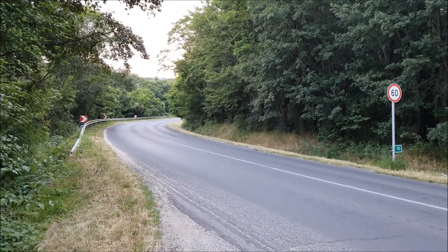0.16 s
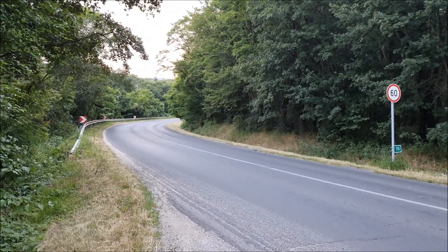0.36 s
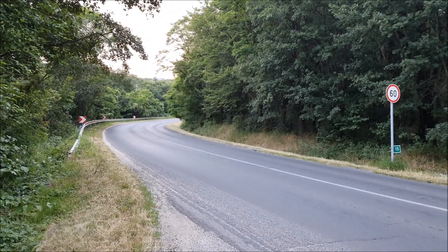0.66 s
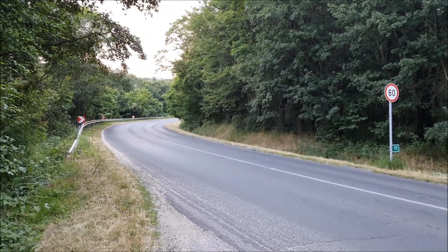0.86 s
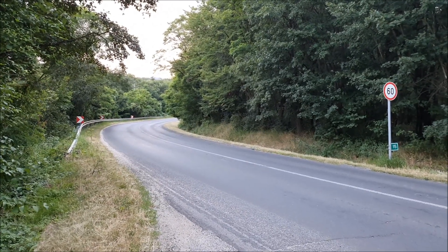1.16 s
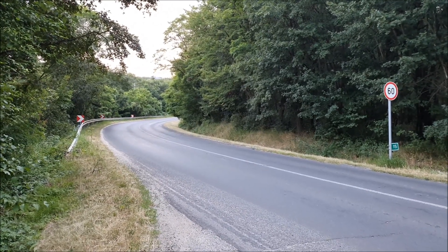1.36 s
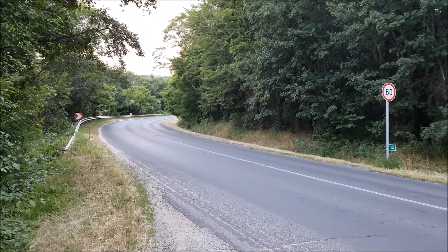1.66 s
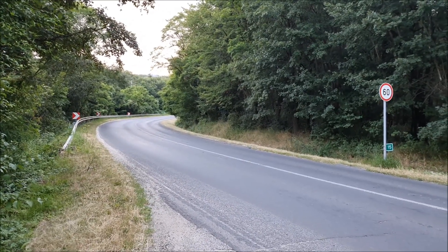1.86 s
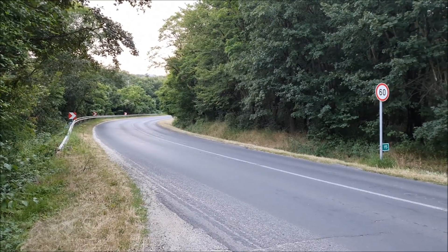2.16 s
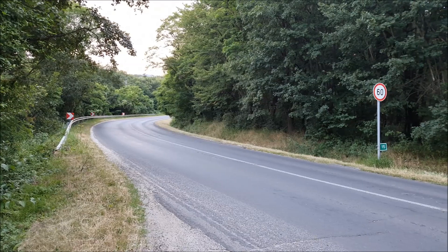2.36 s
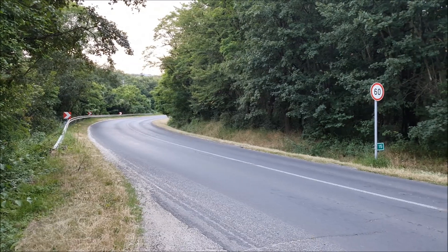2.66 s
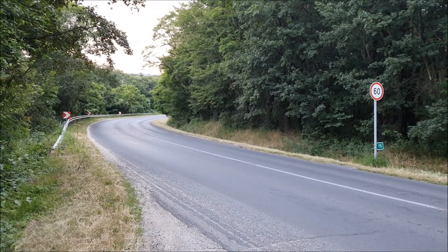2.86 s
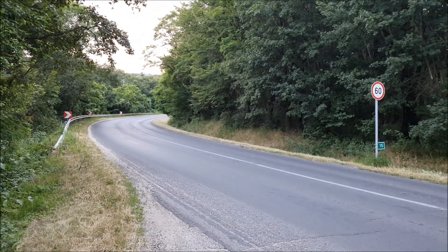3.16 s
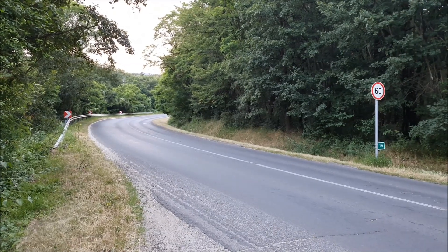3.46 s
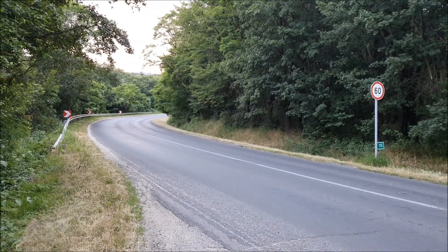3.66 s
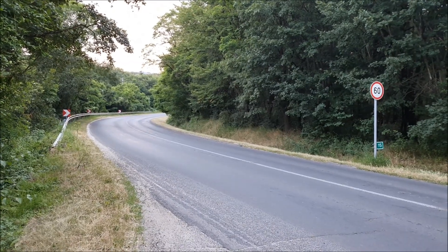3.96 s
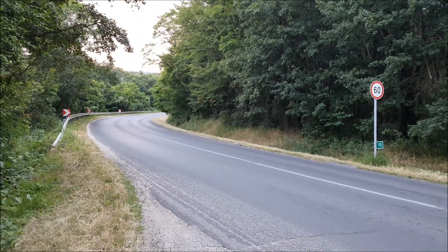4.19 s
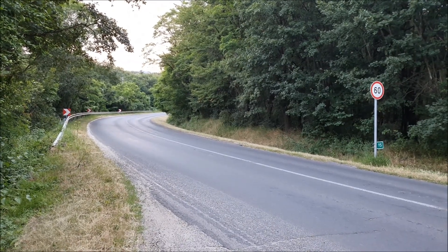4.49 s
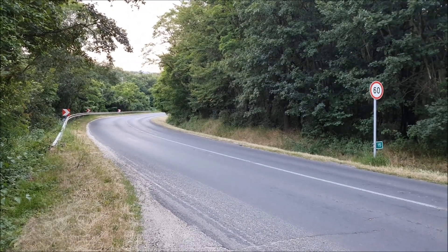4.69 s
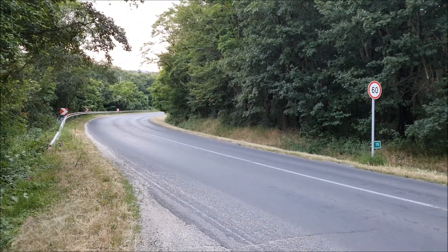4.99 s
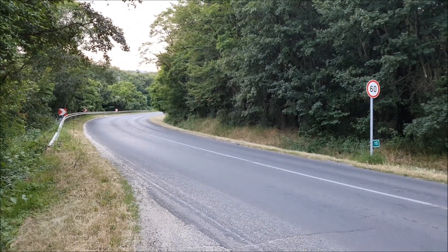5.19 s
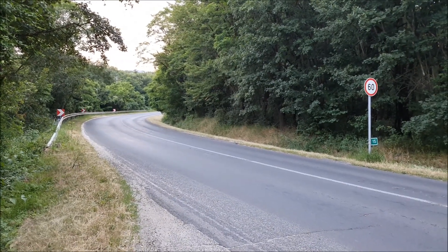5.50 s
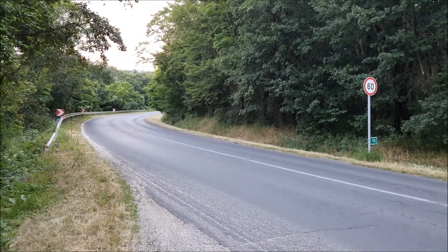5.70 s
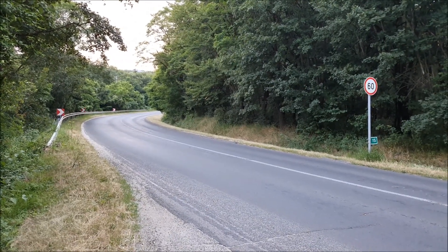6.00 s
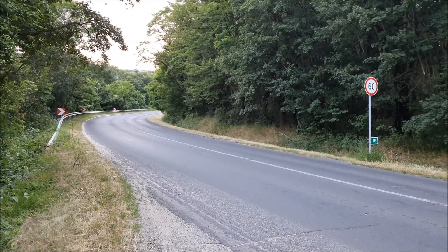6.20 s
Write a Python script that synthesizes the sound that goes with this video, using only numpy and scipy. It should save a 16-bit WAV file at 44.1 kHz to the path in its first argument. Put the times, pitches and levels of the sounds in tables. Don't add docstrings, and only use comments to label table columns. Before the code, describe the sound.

Forest road, distant stereo microphones, car never near. At 0 s a six-cylinder exhaust drones under load around 120 Hz, raspy with hollow singing in the pipe. At about 0.2 s the throttle lifts: the note stumbles with a soft thump and small woody knock, stumbling again near 0.4 s. High chirps sound on the left at 0.3-0.6 s. The roar thins and the hum slides gradually lower; a faint pop comes at 1.5 s. Small birds peep, with clearer falling whistles at 2.5 and 2.75 s. At 3.64 s the loudest bang hits, a deep thump with a hard, ringing double crack scattering among trees; the level ducks, then recovers. A tight double pop follows at 4.6 s, another at 4.95 s, then lighter crackles roughly every 0.2 s until 6.2 s, one sharply ticking at 5.4 s. The wavering drone sinks to about 95 Hz over soft tyre roar and very faint leaf hiss, ending around 6.3 s.

```python
import sys
import numpy as np
from scipy import signal
from scipy.fft import rfft, irfft, next_fast_len
from scipy.io import wavfile
from scipy.ndimage import uniform_filter1d

SR = 44100
rng = np.random.default_rng(int(sys.argv[2]) if len(sys.argv) > 2 else 0)


def transcribe(u):
    v = np.clip(np.atleast_2d(u).T, -1, 1)
    q = np.round(v * 32767).astype(np.int16)
    wavfile.write(sys.argv[1], SR, q)


def magnitude_from_level(level_db):
    exponent = np.asarray(level_db, float) / 20
    return 10 ** exponent


N = 279679

# (time [s], firing rate [Hz], firing note [dB], exhaust flow, from 3.6 s with the bangs'
# # rolling echo [dB])
COAST = [(0, 121.3, -32, -0.5), (.4, 120.8, -27, -4.5), (.55, 117.2, -29.5, -7.5),
         (1.1, 115.8, -29.5, -12.5), (2.0, 111.6, -28.5, -18.5), (2.5, 109.2, -30, -18.5),
         (3.3, 106, -30.5, -21), (3.6, 105, -34, -20), (3.72, 101.2, -29, 0.5), (3.95, 101.2, -35.5, -4),
         (4.3, 100.6, -32.5, -16), (4.75, 100, -38.5, -8), (5.1, 99, -36, -12), (5.4, 97, -39, -17.5),
         (5.9, 95.8, -38.5, -17.5), (6.34, 95.4, -39, -16)]
# (time [s], dip [dB], half length [s], pitch sag [Hz])
STUMBLES = [
    (0.231, -17, .014, 10.06),
    (0.438, -14.5, 0.0178, 5.99),
    (1.543, -6, 0.015, 0.3),
]
REBOUND = 0.11
LIFT_S = 0.225
# (turns of the crankshaft [ratio], level [dB])
COASTING_ORDERS = [(0.5, -56), (1.3, -29.5), (1.4, -31.5), (2, -16.5), (2.5, -23), (3, 0), (3.5, -22),
                   (4, -25), (4.5, -31), (5, -23.5), (5.5, -27.5), (6, -26.5), (7.3, -41), (7, -30),
                   (7.5, -32.5), (8, -25.5), (7.7, -32), (9, -32), (9.5, -29), (10, -35.5), (9.6, -41),
                   (9.8, -36), (13, -32), (12, -38.5), (13, -38.5), (13, -32), (13.5, -47), (14, -26),
                   (17, -42.5), (15, -41)]
# (nominal turns, not read [ratio], level
# [dB])
PULLING_ORDERS = [(0.5, -34), (1, -22), (1.5, -25.5), (2, -11.5), (2.5, -19.5), (3, 0), (3.5, -5), (4, -6),
                  (4.5, -7.5), (5, -4), (5.5, -9), (6, -23.5), (6.5, -33), (7, -10.5), (7.5, -18), (8, -23),
                  (8.5, -16.5), (9, -11.5), (9.5, -30), (10, -25), (10.5, -21.5), (11, -25), (11.5, -43),
                  (12, -31), (12.5, -19), (13, -13), (13.5, -23.5), (14, -15), (18, -13), (15, -16)]
UNEVEN_DB, UNEVEN_SHARE = -36, 0.8
FOURTH_DB, FOURTH_DB_PER_HZ = -34, -0.3445
WAVER_DB, CUT_S, CUT_WAVER_DB = 0.9, 3.66, 2.6

# (resonance [Hz], width [Hz], level at full flow [dB])
PIPE_TONES = [
    (361.5, 24, -44),
    (531.3, 19, -45.5),
    (750, 30, -52),
]
PIPE_SHARE = 0.78

# (time of the trough [s], level [dB], pitch [Hz], ring [s])
THUMPS = [(0.227, -32, 69.6, 0.0089), (0.419, -32, 90, .008), (1.522, -27, 106, 0.0061),
          (3.6289, -20.5, 125, 0.027), (3.6383, -4, 97, 0.014), (4.5931, -18.5, 185, 0.0023),
          (4.5989, -11.5, 147, 0.0026), (4.609, -13, 59.5, 0.0084), (4.9506, -13, 115, 0.0044),
          (5.1845, -15.5, 108, 0.011), (5.3966, -16, 109, 0.0083), (5.598, -16, 109.3, 0.0058),
          (5.839, -15, 112, 0.0073), (6.0178, -17.5, 105.7, 0.007), (6.2062, -14, 110, 0.0046)]
# (time [s], level [dB], length [s], tail pipe ring [Hz], second ring [Hz])
CRACKS = [(1.539, -36.5, 0.0028, 794, 2600), (3.645, -23, 0.0027, 687, 1740),
          (3.6535, -18.5, 0.0038, 710, 1710), (4.596, -28.5, 0.014, 464, 900),
          (4.6118, -18, 0.003, 775, 2240), (4.6172, -18, 0.0027, 760, 1160),
          (4.9662, -20, 0.004, 750, 1257), (5.2035, -31.5, 0.0067, 1200, 2250),
          (5.411, -28.5, 0.0013, 836, 2620), (5.414, -36.5, 0.0018, 1270, 1320),
          (5.6128, -36, 0.0055, 760, 1300), (5.856, -30.5, 0.0043, 857, 2220),
          (6.031, -37, 0.0033, 740, 1700), (6.2225, -29, 0.0037, 800, 1710),
          (3.697, -37.5, 0.0065, 1880, 1510)]
# (frequency [Hz], density [dB per Hz])
CRACK_COLOUR = [(150, -34), (300, -4.5), (620, -1.5), (770, 1), (1100, -2), (1640, -7), (2250, -10),
                (3050, -15), (4800, -45.5), (5600, -59), (6500, -66), (8200, -84), (12000, -88.5)]
TIP_HZ = [2760, 3900, 4800]
RING, TIP_RING = 5.5, 2.5
TREBLE_LAG_S, FULL_RING_S = 0.0015, 0.0045
BRIGHT_DB, BRIGHT_DB_PER_MS, BRIGHT_PER_DB = 4, -0.63, 0.07
# (time [s], level [dB])
TICK = (5.4115, -32)
# (frequency [Hz], level [dB])
TICK_COLOUR = [(3000, -20.5), (5500, 0.5), (7200, -26.5), (9000, 4.5), (14000, -6.5)]

# (frequency [Hz], reverberation time T60 [s])
TREES_DECAY = [(300, 14), (790, 2.2), (2090, 1.3), (5510, 0.92)]
# (frequency [Hz], level [dB])
TREES_COLOUR = [(100, -14.5), (300, -3.5), (800, -9.5), (2000, -12.5), (3500, -14), (5000, 4), (7000, -13)]
SCATTER_DB, SCATTER_SHARE = -24.5, 0.56

# (start [s], length [s], resting pitch [Hz], starting pitch above it [Hz], level [dB])
HIGH_BIRD = [
    (.327, .07, 5770, 251, -67.5),
    (0.399, 0.12, 5890, 200, -69),
    (0.584, .065, 5800, 102, -73.5),
]
# (start [s], length [s], resting pitch [Hz], starting pitch above it [Hz], level [dB])
LOW_BIRD = [
    (1.279, 0.039, 3090, 101, -62),
    (1.78, 0.033, 3750, 9, -74.5),
    (2.025, 0.057, 3755, -9.5, -63.5),
    (2.503, 0.098, 3330, 190.5, -54),
    (2.744, 0.089, 3210, 418.5, -54.5),
]
# (start [s], length [s], resting pitch [Hz], starting pitch above it [Hz], level [dB])
FAINT_BIRDS = [
    (.984, .06, 3790, 60, -76),
    (1.6, .05, 4300, 300, -80),
    (1.635, .06, 4750, -200, -81),
    (1.81, .05, 5230, 10, -80),
    (1.86, .09, 2960, 100, -76),
    (2.08, .12, 3880, -60, -77),
    (2.3, .06, 3070, 10, -79),
]
# (start [s], length [s], resting pitch [Hz], starting pitch above it [Hz], level [dB])
KNOCK = [
    (0.257, 0.037, 1254, 39.9, -39.5),
]
SINGER_SIDES = [13.5, -4, -6, -11]
SINGER_FLUTTER = [.014, .008, .022, .008]
SINGER_ECHO = [-3, -9, -1, -9]
SETTLE_S = 0.014
CREST, ENDS_DB = 0.42, -17

# (frequency [Hz], density [dB per Hz])
ROAR_COLOUR = [(25, -21.5), (45, -5), (80, -2.5), (190, 0.5), (245, -19.5), (330, -9), (520, -13.5),
               (640, -19), (790, -10), (1750, -15.5), (1900, -22), (2380, -25.5), (2560, -33), (3300, -41),
               (6000, -56.5), (7400, -62)]
# (frequency [Hz], width [Hz], lift [dB])
ROAR_BODY = [(377, 40, 3.5), (560, 23, 1), (750, 28, 4), (1275, 89, 4), (1627, 69, 3.5), (2220, 150, 3.5),
             (2690, 80, 4.5)]
RUMBLE_DB, RUMBLE_SHARE, GUST_DB = -45.5, 0.16, 4.5
MIDDLE_DB, MIDDLE_SHARE = -30.5, 1.01
TYRES_DB, TYRES_SHARE, TYRES_DB_PER_S = -40.5, 0.22, -0.62

# (frequency [Hz], density [dB per Hz])
HISS_COLOUR = [(7500, -42), (7900, -7.5), (9000, -0.5), (10200, -5.5), (11000, -10), (13000, -13),
               (15700, -19.5)]
HISS_DB = -76

# (frequency [Hz], likeness [0 to 1])
PORT_LIKENESS = [(60, .995), (180, 1), (400, 0.76), (1000, 0.92), (2500, 0.7), (5000, 0.19), (9000, .3),
                 (11000, .5), (13000, 0.73)]
# (frequency [Hz], left minus right [dB])
CAR_TILT = [(60, -1.1), (400, -1.2), (750, -2), (1300, -5.5), (2600, -3.5), (5000, 0)]
LEAD_S = 0.00017


def evened(x):
    return x / np.sqrt(np.mean(x ** 2) + 1e-20)


def read(points, hz):
    f, value = np.transpose(points)
    return np.interp(np.log(hz + 1), np.log(f + 1), value)


def curves(rows, t):
    s, *columns = np.transpose(rows)
    return [np.interp(t, s, c) for c in columns]


def add(mix, s, sound):
    part = mix[..., round(s * SR):][..., :sound.shape[-1]]
    part += sound[..., :part.shape[-1]]


def drift(hz, size):
    return evened(signal.lfilter(*signal.butter(2, hz, fs=SR), rng.standard_normal(size)))


def colour(x, shape, tilt_db=0):
    hz = abs(np.fft.fftfreq(4096, 1 / SR))
    gain_db = read(shape, hz) + tilt_db * np.log2(hz / 1000 + 0.061)
    log_gain = gain_db * np.log(10) / 20
    taps = np.fft.ifft(np.exp(np.conj(signal.hilbert(log_gain)))).real[:2048]
    return signal.fftconvolve(x, taps[None] if x.ndim > 1 else taps, axes=-1)[..., :x.shape[-1]]


def port_half(hz, tilt, lead_s):
    return magnitude_from_level(read(tilt, hz) / 2) * np.exp(1j * np.pi * hz * lead_s)


def ports(x):
    size = next_fast_len(N + 4096)
    half = port_half(np.fft.rfftfreq(size, 1 / SR), CAR_TILT, LEAD_S)
    spectrum = rfft(np.pad(x, (0, 1024), "reflect"), size)
    return irfft(spectrum * np.array([half, 1 / half]), size)[:, :N]


def wash(level_db, patchy_db, tilt, lead_s):
    frames, hz = N // 256 + 5, np.fft.rfftfreq(1024, 1 / SR)[:, None]
    a, b, c, d, patches = rng.standard_normal((frames, 513, 5)).T
    patches = evened(uniform_filter1d(uniform_filter1d(patches, 8, 0), 12, 1))
    same = np.clip(read(PORT_LIKENESS, hz), -1, 1)
    left = a + 1j * b
    right = same * left + np.sqrt(1 - same ** 2) * (c + 1j * d)
    half = port_half(hz, tilt, lead_s)
    z = np.array([left * half, right / half])
    z *= magnitude_from_level(level_db(hz, np.arange(frames) * 256 / SR) + patchy_db * patches)
    return signal.istft(z, nperseg=1024, noverlap=768)[1][:, :N]


def engine():
    t = np.arange(N) / SR
    hz, note_db, flow_db = curves(COAST, t)
    uneven_db = UNEVEN_DB + UNEVEN_SHARE * flow_db
    fourth_db = np.maximum(FOURTH_DB + FOURTH_DB_PER_HZ * (hz - 95) - uneven_db, 0)
    for s, dip_db, half, sag_hz in STUMBLES:
        dip = np.exp(-((t - s) / half) ** 2)
        after = np.exp(-((t - s) / half - 2) ** 2)
        hz = hz - sag_hz * (dip + after)
        note_db = note_db + dip_db * (dip - REBOUND * after)
    unsteady_hz = uniform_filter1d(hz, 1200) * (1 + 0.004 * drift(12, N))
    crank = 2 * np.pi * np.cumsum(unsteady_hz) / SR / 3
    note_db = note_db + np.where(t < CUT_S, WAVER_DB, CUT_WAVER_DB) * drift(14, N)
    out = np.sqrt(2) * magnitude_from_level(note_db) * np.sin(3 * crank)
    waver = [drift(7, N) for k in range(6)]
    load = np.clip((LIFT_S - t) / 0.02, 0, 1)
    for k, ((order, db), (_, pulling_db)) in enumerate(zip(COASTING_ORDERS, PULLING_ORDERS)):
        if order == 3:
            continue
        level_db = db + load * (pulling_db - db - 11.5) + 18.5 + uneven_db
        level_db = level_db + fourth_db * {4: 1, 5: 0.4}.get(order, 0)
        level_db = level_db + 2 * (1 - load) * waver[k % 6]
        phase = order * crank + 6 * rng.random() + 0.3 * waver[(k + 2) % 6]
        out += magnitude_from_level(level_db) * np.sin(phase)
    return out


def pipe():
    flow_db = curves(COAST, np.arange(N) / SR)[-1]
    sung = np.zeros(N)
    for hz, width, db in PIPE_TONES:
        tone = signal.lfilter(*signal.iirpeak(hz, hz / width, SR), rng.standard_normal(N))
        sung += magnitude_from_level(db) * evened(tone)
    return magnitude_from_level(PIPE_SHARE * flow_db) * signal.lfilter(*signal.butter(2, [300, 850], "band", fs=SR), sung)


def thump(s, db, hz, ring):
    t = np.arange(-0.012, 0.06, 1 / SR)
    turns = hz * 0.022 * (1 - np.exp(-t / 0.023))
    body = np.where(t < 0, np.exp(-(t / 0.0035) ** 2), np.exp(-(t / (1.3 * ring)) ** 2))
    return s + t[0], -magnitude_from_level(db) * body * np.cos(2 * np.pi * turns)


def crack(db, length, bright_db, rings_hz):
    t = np.arange(0.06 * SR) / SR
    shocks = rng.standard_normal(len(t)) * magnitude_from_level(1.5 * rng.exponential(1, len(t)).clip(0, 4))
    z = rfft(shocks * (1 - np.exp(-t / (0.3 * length))) * np.exp(-t / length))
    shocks = irfft(z / uniform_filter1d(abs(z), size=5), len(t))
    shocks = shocks * np.clip(t / 0.001, 0, 1) * np.exp(-(t / (3 * length)) ** 2)
    ring_gain = min(length / FULL_RING_S, 1)
    first, second, *tips = [signal.lfilter(*signal.iirpeak(hz, 10, SR), shocks) * ring_gain
                            for hz in [*rings_hz, *TIP_HZ]]
    rest = shocks + RING * second + TIP_RING * sum(tips)
    rest = np.pad(rest, (round(TREBLE_LAG_S * SR), 0))[:len(t)]
    rung = colour(RING * first + rest, CRACK_COLOUR, bright_db)
    return magnitude_from_level(db) * rung / np.sqrt(np.mean(rung[:441] ** 2))


def trees(x, stretch):
    taps = np.zeros((2, SR))
    at = np.arange(200, SR - 20, 20) + rng.integers(0, 20, (2, (SR - 201) // 20))
    np.put_along_axis(taps, at, rng.choice([-1., 1.], at.shape), 1)
    taps[1] = 0.08 * taps[0] + 0.74 * taps[1]
    hz, t, z = signal.stft(taps, SR, nperseg=256)
    fade = magnitude_from_level(-60 * t / (stretch * read(TREES_DECAY, hz)[:, None]))
    swell = 1 + 0.78 * np.exp(-((t - 0.028) / 0.026) ** 2)
    tail = signal.istft(z * fade * swell, SR, nperseg=256)[1]
    return signal.fftconvolve(x[None], tail / np.linalg.norm(tail[0]), axes=1)[:, :N]


def birds():
    out, smear = np.zeros((2, N)), np.zeros(N)
    singers = [HIGH_BIRD, LOW_BIRD, FAINT_BIRDS, KNOCK]
    for notes, pan_db, flutter, echo_db in zip(singers, SINGER_SIDES, SINGER_FLUTTER, SINGER_ECHO):
        for s, length, rest_hz, above_hz, db in notes:
            t = np.arange(0, length, 1 / SR)
            hz = rest_hz + above_hz * np.exp(-t / SETTLE_S)
            away = np.interp(t / length, [0, CREST, 1], [1, 0, 1])
            level = magnitude_from_level(db + 3 + ENDS_DB * away ** 2) * signal.windows.tukey(len(t), 0.2)

            def whistle(wobble):
                wander = drift(250, 6000)[:len(t)]
                wobbly_hz = hz * (1 + wobble * (wander - wander.mean()))
                return level * np.sin(2 * np.pi * np.cumsum(wobbly_hz) / SR)
            note, blur = whistle(flutter), whistle(0.05)
            add(out, s, note * magnitude_from_level(np.array([[0.5], [-0.5]]) * pan_db))
            add(smear, s, magnitude_from_level(echo_db) * (0.8 * note + 0.8 * blur))
    return out + trees(smear, 0.6)


def roar():
    gusts = drift(2.3, N)[::256]

    def level_db(hz, t):
        flow_db = curves(COAST, t)[-1]
        rumble_db = RUMBLE_DB + RUMBLE_SHARE * flow_db + GUST_DB * np.resize(gusts, len(t))
        middle_db = MIDDLE_DB + MIDDLE_SHARE * flow_db
        high_db = TYRES_DB + TYRES_SHARE * flow_db + TYRES_DB_PER_S * t
        low = np.clip(np.log2(220 / (hz + 1)), 0, 1)
        high = np.clip(np.log2(hz / 450 + 0.01), 0, 1)
        parts_db = low * rumble_db + (1 - low - high) * middle_db + high * high_db
        body_db = sum(db * np.exp(-((hz - f) / width) ** 2) for f, width, db in ROAR_BODY)
        return read(ROAR_COLOUR, hz) + body_db + parts_db - 3.0
    return wash(level_db, 1.31, CAR_TILT, LEAD_S)


def hiss():
    left_tilt = [(7000, 14.5), (10000, 7.0), (13000, 0)]  # (frequency [Hz], left minus right [dB])
    return magnitude_from_level(HISS_DB) * evened(wash(lambda hz, t: read(HISS_COLOUR, hz) + 0 * t, 0.8, left_tilt, 0))


def scene():
    car, sent = engine() + pipe(), np.zeros((3, N))
    for row in THUMPS:
        s, db = row[:2]
        add(car, *thump(*row))
        add(car, s - 0.005, crack(db - 21, 0.009, -7, [330, 450]))
    for k, (s, db, length, *rings_hz) in enumerate(CRACKS):
        bright_db = BRIGHT_DB + BRIGHT_DB_PER_MS * 1000 * length + BRIGHT_PER_DB * (db + 27.5)
        add(car, s - 1.5 * TREBLE_LAG_S, crack(db, length, bright_db, rings_hz))
        shock = colour(np.eye(1, 2048)[0], CRACK_COLOUR, bright_db)
        scatter = magnitude_from_level(SCATTER_DB + SCATTER_SHARE * (db + 27.5))
        add(sent[k % 3], s, scatter * 21 * shock / np.linalg.norm(shock))
    echoes = colour(sum(trees(x, 0.85) for x in sent), TREES_COLOUR)
    tick_s, tick_db = TICK
    add(car, tick_s, magnitude_from_level(tick_db) * colour(np.eye(1, 512)[0], TICK_COLOUR))
    return ports(car) + echoes * magnitude_from_level([[-1.5], [1.5]]) + birds() + roar() + hiss()


def band_limit(x):
    return signal.sosfilt(signal.butter(12, 15750, fs=SR, output="sos"), x)


def record(dry):
    x = signal.lfilter(*signal.butter(2, 35, "high", fs=SR), dry)
    x[:, 2] += 0.07
    power_db = 10 * np.log10(abs(uniform_filter1d((x ** 2).mean(0), 800)) + 1e-12)
    fall_db = np.arange(N) * 9.3 / SR
    held_db = np.maximum.accumulate(power_db + fall_db) - fall_db
    over_db = np.maximum(held_db + 20.5, 0)
    late_db = np.roll(uniform_filter1d(over_db, 900), 700)
    return band_limit(x / magnitude_from_level(0.44 * late_db))


dry = scene()
out = record(dry)
transcribe(out)
```